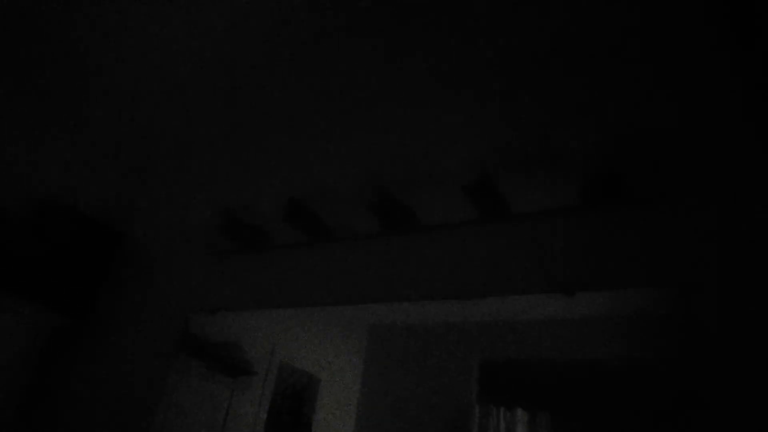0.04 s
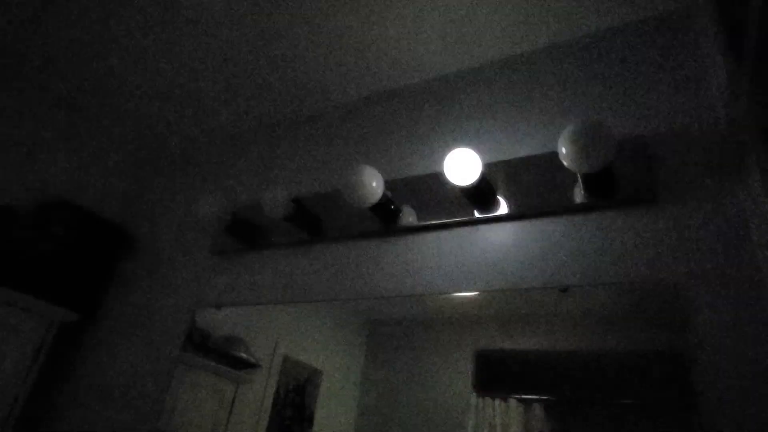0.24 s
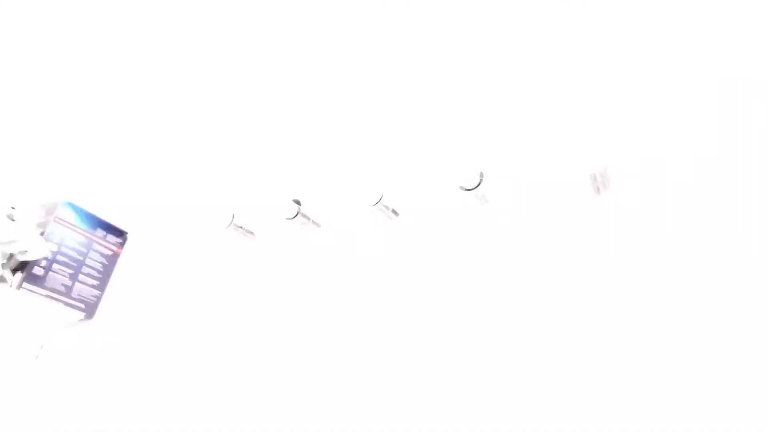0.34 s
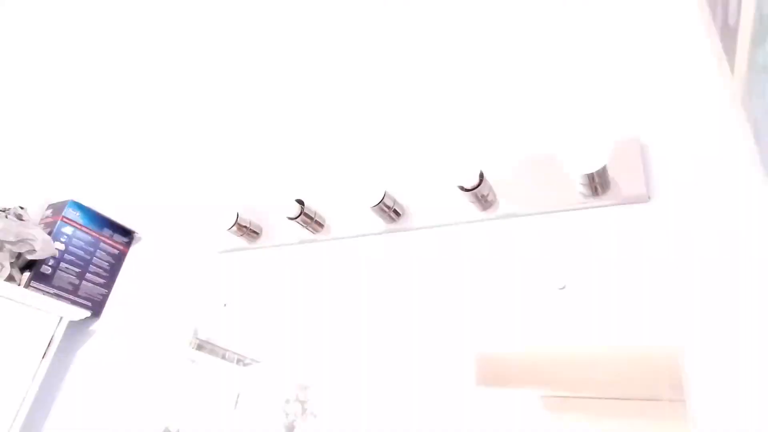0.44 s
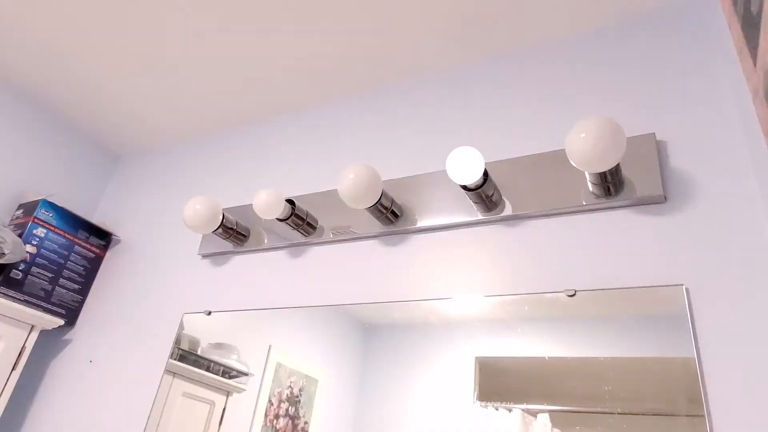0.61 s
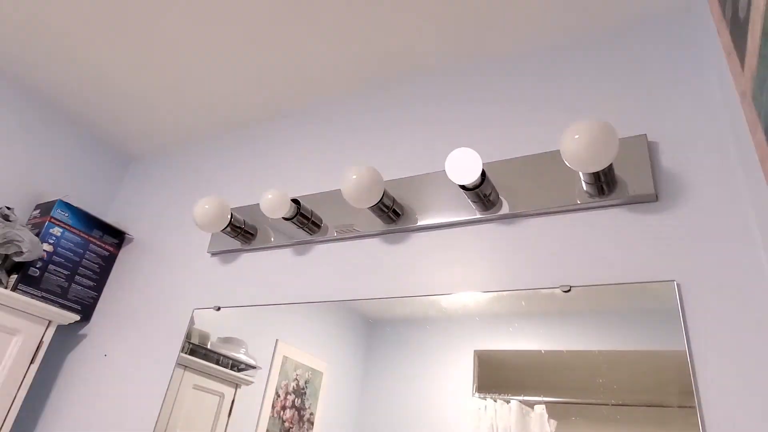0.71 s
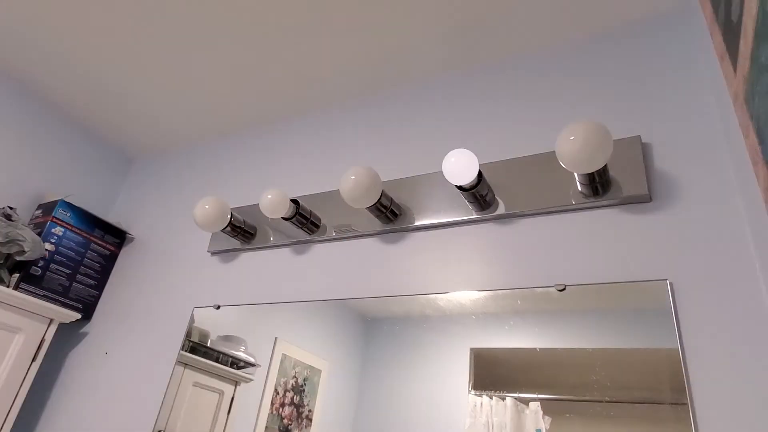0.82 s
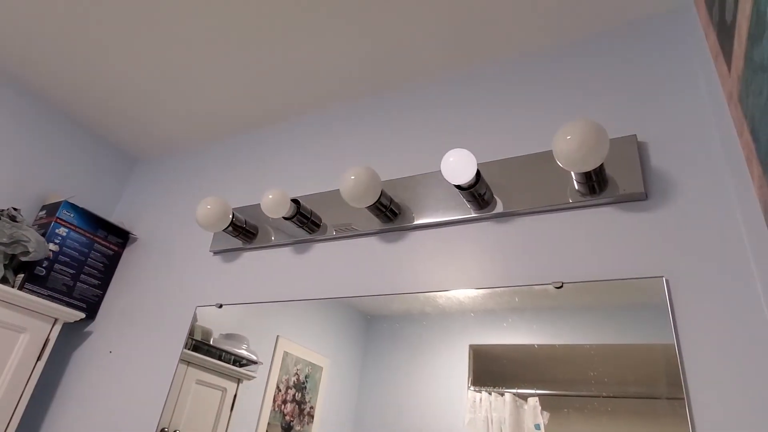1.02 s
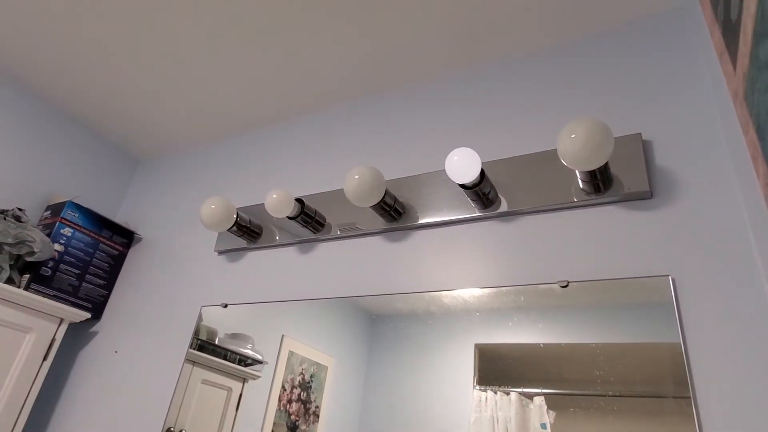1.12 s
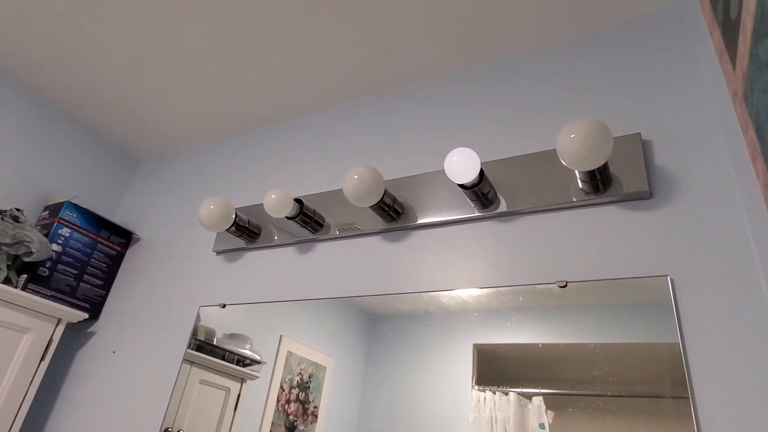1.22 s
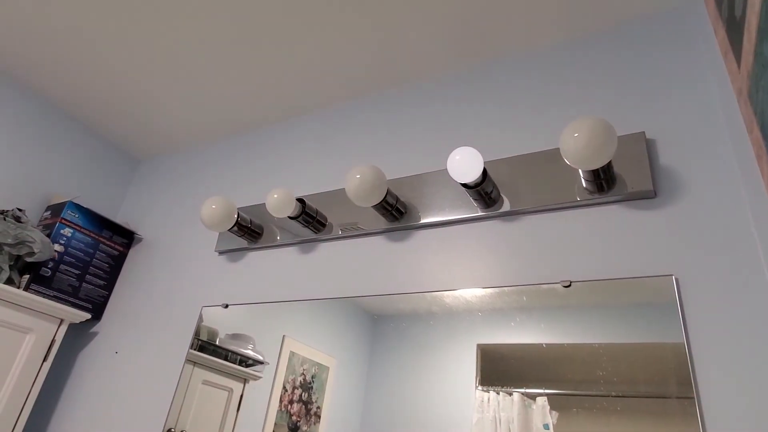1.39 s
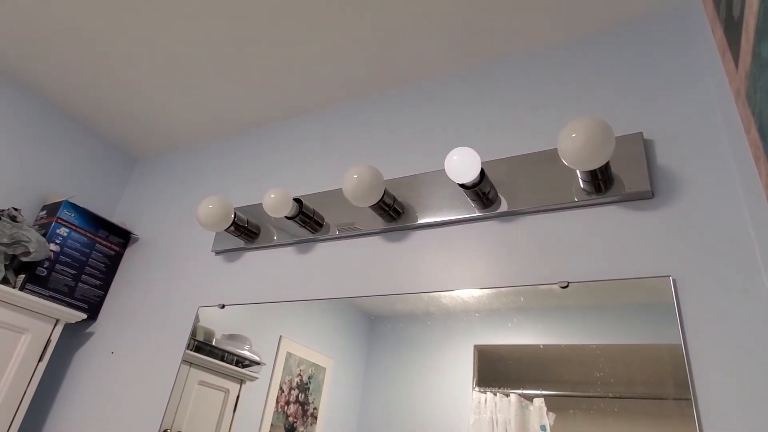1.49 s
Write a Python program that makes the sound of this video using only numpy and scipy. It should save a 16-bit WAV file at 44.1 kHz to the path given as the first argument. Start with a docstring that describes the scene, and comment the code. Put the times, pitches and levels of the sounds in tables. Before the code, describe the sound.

A wall light switch is flipped with one sharp plastic click that rings briefly in a small bathroom. A soft, dull knock follows about a second later, over a faint low hum and thin hiss.

```python
"""A wall light switch is flipped once in a small, hard bathroom.
A faint mains hum, a low rumble and a thin hiss are there from the start. At 0.22 s the lever ticks
as it passes its spring, then snaps home: the plastic plate cracks, the metal parts ping, the hollow
wall thumps and the room rings briefly. A faint tail lingers, and a soft knock follows at 1.3 s."""
import sys
import numpy as np
from scipy import signal
from scipy.fft import rfft, irfft
from scipy.io import wavfile

SR = 44100
rng = np.random.default_rng(int(sys.argv[2]) if len(sys.argv) > 2 else 0)


def transcribe(u):
    """Save the signal u as a 16-bit wav file named by the first command-line argument.

    u: samples, shape (n,) or (channels, n), limited to [-1, 1]; the rate is SR.
    q: integer samples, one column per channel.
    """
    v = np.clip(np.atleast_2d(u).T, -1, 1)
    q = np.round(v * 32767).astype(np.int16)
    wavfile.write(sys.argv[1], SR, q)


N = 68355
T = np.arange(N) / SR
HZ = np.fft.rfftfreq(2 * N, 1 / SR)
HIGHEST_HZ = 16000

# The lever's tick and snap. Each row: start in seconds, level in dB, dB added per octave
# down into the bass, dB added per octave up into the top treble.
CLICKS = [(0.2226, -26, -6, -10.5), (0.2360, 1, 1.5, 0.5)]
SNAP_S = CLICKS[-1][0]
# Which side the switch is louder on. Each row: frequency in Hz, left minus right in dB.
BALANCE = [(100, -2), (380, -1), (700, -5), (1100, -8), (1800, -7), (2500, -3), (4400, 2), (8000, 2.5),
           (15000, 3.5)]


def switch(crack_db=-2.5, room_db=6.5, middle_hz=2000, top_hz=6500):
    """Each hit of the lever cracks, bounces off the nearby walls and sets the room ringing."""
    # The tone of the crack. Each row: frequency in Hz, level in dB.
    crack_tone = [(200, -14.5), (1400, -9), (3300, 2), (9000, 0)]
    # The first echoes. Each row: delay in seconds, level in dB, dB added per octave above middle_hz.
    echoes = [(.0027, 0.5, -9.5), (.0065, -2.5, -5), (0.012, -4, -5), (0.0183, -5, -6)]
    octaves = np.log2((HZ + 20) / middle_hz)
    below_middle, above_middle = np.maximum(-octaves, 0), np.maximum(octaves, 0)
    above_top = np.maximum(np.log2((HZ + 20) / top_hz), 0)
    sound = np.zeros((2, N))
    for start, db, bass_slope, treble_slope in CLICKS:
        hit_db = db + bass_slope * below_middle + treble_slope * above_top
        early = crack()
        for lag, echo_db, dulling in echoes:
            early += delay(colour(crack(), echo_db + dulling * above_middle), lag)
        early = colour(early, hit_db + crack_db + curve(crack_tone) + plate_db(in_room=False))
        ring = colour(room(), hit_db + room_db + plate_db(in_room=True))
        sound += delay(early + ring, start)
    side_db = curve(BALANCE) / 2
    return np.array([colour(sound[0], side_db), colour(sound[1], -side_db)])


def crack(fade_s=0.012):
    """The parts rattle for an instant as they meet: a tiny burst of noise."""
    burst = even_noise(size=128) * fade(fade_s)
    return unit(burst) / np.sqrt(N)


def plate_db(in_room):
    """The switch and its plate favour some pitches: their boost in dB at every frequency."""
    # The broad tone of the snap. Each row: frequency in Hz, level in dB.
    snap_tone = [(40, -25.5), (90, -2), (180, -8), (330, -0.5), (520, -4.5), (1000, -4), (1700, -1.5),
                 (2600, -2), (4200, -6), (6000, -8.5), (7600, -8.5), (8100, -18.5), (9300, -11),
                 (11200, -15.5), (11900, -18.5), (14000, -16), (16000, -27.5)]
    # The favoured pitches. Each row: pitch in Hz, width in Hz, dB boost in the crack, dB boost in the room.
    peaks = [(1647, 98, 7, 7), (1794, 84, 7, 7), (1984, 50, 7, 5), (3220, 280, 11.5, 5), (4677.5, 34, 6, 6),
             (4815, 87, 11.5, 8.5), (6830, 98, 6, 3), (9400, 350, 7, 8), (11053, 560, 5, 8)]
    db = curve(snap_tone)
    for hz, width, crack_boost, room_boost in peaks:
        boost = room_boost if in_room else crack_boost
        db += boost / (1 + (2 * (HZ - hz) / width) ** 2)
    return db


def pings():
    """The snap leaves the switch's metal spring and contacts ringing briefly."""
    # Each row: pitch in Hz, level in dB, seconds to fade by 60 dB, left minus right in dB.
    notes = [(1789, -37.5, 0.24, -9), (1977, -37.5, 0.15, -7), (2426, -47.5, .24, -2),
             (3162, -42.5, 0.16, -1), (3220, -44, .13, -1.5), (4817, -40.5, .18, 4)]
    ring = np.zeros((2, N))
    for hz, db, fade_s, balance_db in notes:
        wave = np.sin(2 * np.pi * (hz * T + rng.random((2, 1))))
        ring += amp(db) * pan(balance_db) * fade(fade_s) * wave
    return delay(ring, SNAP_S)


def wall_thump(settle_s=0.032):
    """The snap shakes the hollow wall and the room's air: low notes swell, hold and die away."""
    # Each row: final pitch in Hz, level in dB, seconds to fade by 60 dB, rise time in seconds,
    # seconds before the fade begins, starting pitch as a multiple of the final one.
    notes = [(76, -50.5, 0.27, .008, 0.068, 1.8), (128.13, -47, 0.15, .003, .015, 1),
             (240.6, -46, 0.14, 0.0062, 0.024, 1), (322, -38.5, .11, .002, .007, 1),
             (390.1, -37, 0.065, 0.0046, 0.059, .85), (414.5, -54, 0.27, 0.074, 0.1, 1),
             (511, -46, .17, .006, 0.02, 1), (634, -46.5, .18, 0.011, 0.011, 1),
             (781.6, -47, 0.18, .008, 0.028, 1), (867, -47, .2, .008, .018, 1),
             (949, -46, .15, .008, .018, 1)]
    ring = np.zeros((2, N))
    for hz, db, fade_s, rise_s, hold_s, start_ratio in notes:
        pitch = hz * (1 + (start_ratio - 1) * np.exp(-T / settle_s))
        wave = np.sin(2 * np.pi * np.cumsum(pitch) / SR)
        loudness = amp(db) * rise(rise_s) * fade(fade_s, hold_s)
        ring += loudness * pan(curve(BALANCE, hz)) * wave
    return delay(ring, SNAP_S)


def room(bands=12):
    """Countless echoes blur together; each band of pitches builds and dies at its own speed."""
    # How fast the echoes build up. Each row: frequency in Hz, rise time in seconds.
    rise_times = [(100, 0.017), (700, 0.003), (2000, 0.0021), (10000, 0.0029)]
    # How long the bathroom rings. Each row: frequency in Hz, seconds to fade by 60 dB.
    fade_times = [(70, .4), (200, 0.28), (500, .27), (1500, 0.24), (5000, .26), (9000, 0.21), (15000, 0.23)]
    spectra = stereo_spectra(even_noise(size=1024))
    centres = np.geomspace(50, HIGHEST_HZ, bands)
    ring = np.zeros((2, N))
    for hz, this_band_only in zip(centres, np.eye(bands)):
        band_shape = curve(list(zip(centres, this_band_only)))
        band = irfft(spectra * band_shape)[:, :N]
        ring += rise(curve(rise_times, hz)) * fade(curve(fade_times, hz)) * band
    return unit(ring) / np.sqrt(N)


def late_tail(db=-17, fade_s=0.7):
    """The snap lingers faintly beyond the bathroom after the room's own ring has died."""
    # The tone of the tail. Each row: frequency in Hz, level in dB.
    tone = [(100, -6), (500, -3), (1700, 1), (3500, -8.5), (5500, -10), (9000, -22), (16000, -30)]
    noise = irfft(stereo_spectra(rng.standard_normal((2, N))))[:, :N]
    tail = unit(noise * fade(fade_s)) / np.sqrt(N)
    return delay(colour(tail, db + curve(tone)), SNAP_S)


def knock(start_s=1.327, db=-31):
    """A dull, faint tap and its answer from the room."""
    # The tone of the knock. Each row: frequency in Hz, level in dB.
    tone = [(60, 5.5), (330, 7.5), (700, 6), (850, -0.5), (1350, -7), (2100, -25), (8000, -39)]
    tap = amp(-3.5) * (T == 0)  # one sharp pulse, a little weaker than its echoes
    return delay(colour(tap + room(), db + curve(tone)), start_s)


def mains_hum(waver_hz=2.9):
    """The mains hum: a few low notes that waver at random."""
    # Each row: pitch in Hz, base level in dB, amount of waver, share of the bass swell it follows.
    notes = [(57.9, -67, .1, 1), (117, -73, 0.55, 0.82), (214.6, -82, 1, .2), (331.4, -74, .22, .1)]
    hum = np.zeros(N)
    for hz, db, waver, follow in notes:
        wander = 1 + waver * (drift(waver_hz) + 1j * drift(waver_hz))  # moves both level and pitch
        wave = (wander * np.exp(2j * np.pi * (hz * T + rng.random()))).real
        hum += amp(db + follow * bass_swell_db()) * unit(wave)
    return hum


def rumble(db=-68.5, follow=0.3):
    """Low noise that gently swells and sinks along with the hum."""
    # The tone of the rumble. Each row: frequency in Hz, relative level in dB.
    tone = [(20, -28), (38, -15.5), (56, -2), (85, -3.5), (125, -6), (170, -11.5), (230, -11.5), (280, -13),
            (340, -11), (430, -18), (600, -27), (1000, -46), (3000, -71)]
    return amp(db + follow * bass_swell_db()) * steady_noise(tone)


def bass_swell_db(ceiling_db=-59, base_db=-65):
    """The slow rise and fall that the hum and rumble share."""
    # Each row: time in seconds, bass level in dB before the ceiling limits it.
    levels = [(0.0, -63.5), (0.046, -70), (0.206, -60.5), (0.266, -35), (0.37, -52), (0.5, -62.5),
              (0.574, -61), (0.694, -62), (0.724, -61), (0.996, -71.5), (1.082, -68), (1.186, -62),
              (1.23, -72.5), (1.368, -60.5), (1.48, -65.5), (1.55, -60)]
    return np.minimum(np.interp(T, *np.transpose(levels)), ceiling_db) - base_db


def hiss(db=-80.5):
    """A thin, steady hiss behind everything."""
    # The tone of the hiss. Each row: frequency in Hz, relative level in dB.
    tone = [(20, -0.5), (600, -1.5), (1000, -4), (2500, -6.5), (5000, -11.5), (8000, -18.5), (11500, -11.5),
            (15500, -12.5)]
    return amp(db) * steady_noise(tone)


def steady_noise(tone):
    """Stereo noise of strength 1 with the given tone."""
    spectra = stereo_spectra(rng.standard_normal((2, N)))
    return unit(irfft(spectra * amp(curve(tone)))[:, :N])


def stereo_spectra(noise):
    """Blends two unrelated noises into left and right spectra that share most of their bass."""
    # How alike the sides are. Each row: frequency in Hz, likeness (1 same, 0 unrelated, -1 opposite).
    likeness = [(50, .8), (380, .85), (700, .35), (1300, 0), (2200, -.3), (4500, -.3), (8000, 0),
                (16000, 0)]
    same = curve(likeness)
    mid, side = rfft(noise, 2 * N) * np.sqrt([(1 + same) / 2, (1 - same) / 2])
    return np.array([mid + side, mid - side])


def even_noise(size):
    """Stereo noise with all frequencies about equally strong in every stretch of `size` samples."""
    noise = rng.standard_normal((2, N))
    for _ in range(4):
        spectra = signal.stft(noise, nperseg=size)[2]
        noise = signal.istft(spectra / (abs(spectra) + 1e-12), nperseg=size)[1][:, :N]
    return unit(noise)


def drift(hz):
    """Slow random wandering, up to about `hz` wiggles a second."""
    spectrum = rfft(rng.standard_normal(2 * N))
    return unit(irfft(spectrum / (1 + (HZ / hz) ** 4))[:N])


def colour(x, db):
    """Turns each frequency up or down by `db`; the phase keeps any ringing after the hit."""
    log_gain = np.log(amp(db))
    mirrored = np.r_[log_gain, log_gain[-2:0:-1]]
    phase = -signal.hilbert(mirrored).imag[:len(HZ)]
    return irfft(rfft(x, 2 * N) * np.exp(log_gain + 1j * phase))[..., :N]


def curve(points, hz=HZ):
    """Joins a table's points with lines, giving each octave about equal space."""
    frequencies, values = np.transpose(points)
    return np.interp(np.log(hz + 1), np.log(frequencies + 1), values)


def rise(seconds):
    """Climbs from 0 towards 1, about two thirds of the way in the given time."""
    return 1 - np.exp(-T / seconds)


def fade(seconds, hold_s=0):
    """Holds at 1, then falls by 60 dB in the given time."""
    return amp(-60 * np.maximum(T - hold_s, 0) / seconds)


def pan(db):
    """Left and right gains, with the left `db` above the right."""
    return amp([[db / 2], [-db / 2]])


def delay(x, seconds):
    """Starts a stereo sound later."""
    return np.pad(x, ((0, 0), (round(seconds * SR), 0)))[:, :N]


def amp(db):
    """Turns decibels into a number to multiply by."""
    return 10 ** (np.asarray(db) / 20)


def unit(x):
    """Scales a sound to an average strength (rms) of 1."""
    return x / np.sqrt(np.mean(x ** 2) + 1e-20)


def scene():
    """The flip of the switch and the later knock, over the quiet background."""
    events = switch() + pings() + wall_thump() + late_tail() + knock()
    bass = pan(-2) * (rumble() + mains_hum())  # slightly to the right
    return events + bass + hiss()


def record(dry):
    """Cuts away the treble above HIGHEST_HZ."""
    low_pass = signal.firwin(511, HIGHEST_HZ, window=("kaiser", 9), fs=SR)
    return signal.oaconvolve(dry, low_pass[None], "same")


dry = scene()
out = record(dry)
transcribe(out)
```